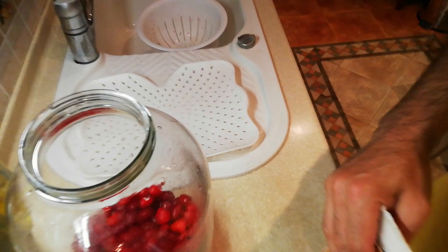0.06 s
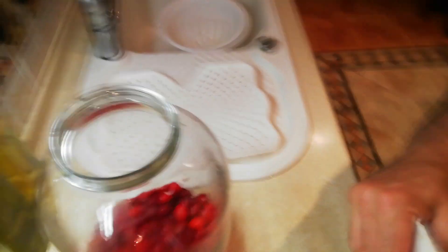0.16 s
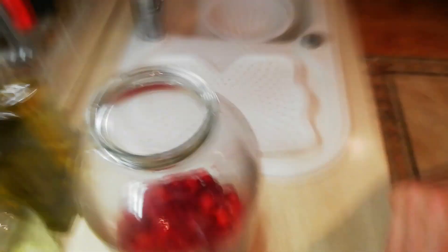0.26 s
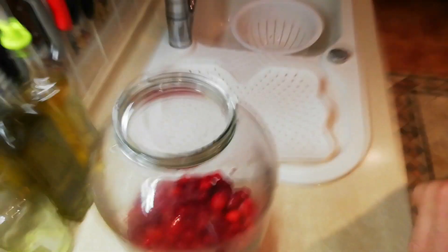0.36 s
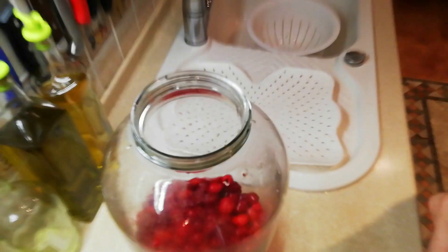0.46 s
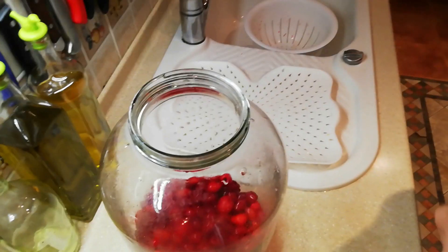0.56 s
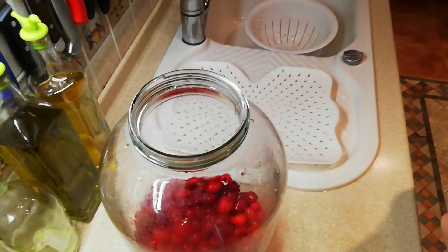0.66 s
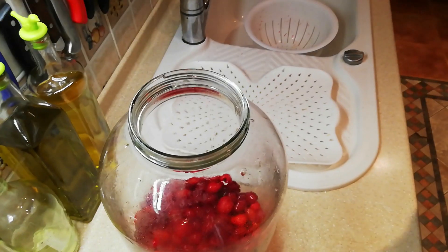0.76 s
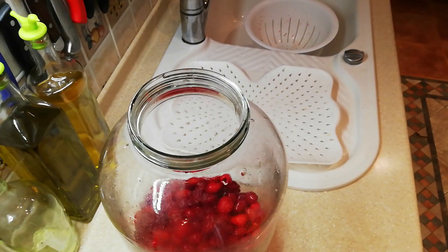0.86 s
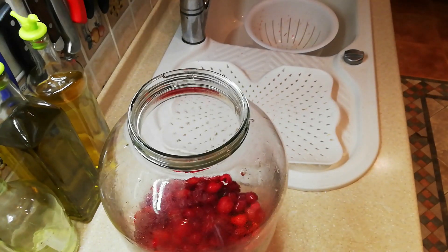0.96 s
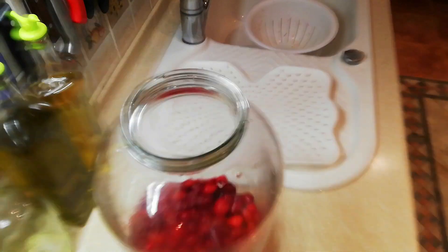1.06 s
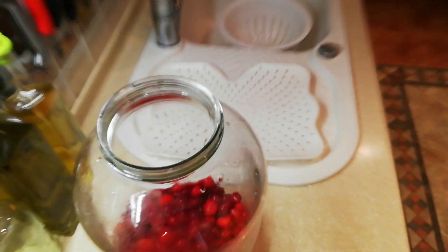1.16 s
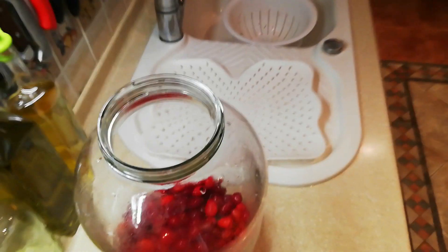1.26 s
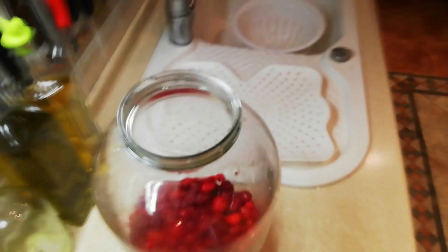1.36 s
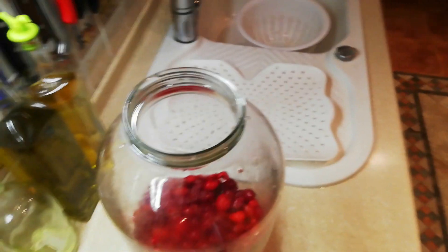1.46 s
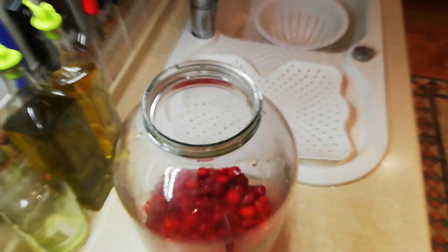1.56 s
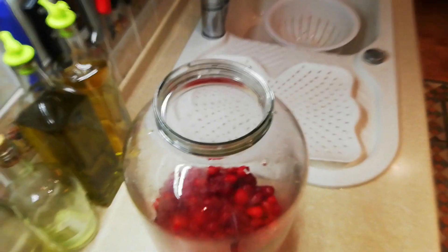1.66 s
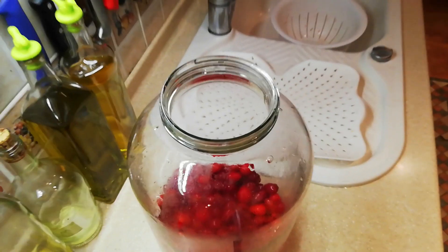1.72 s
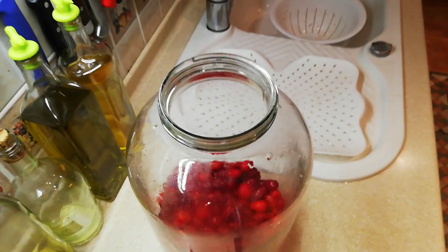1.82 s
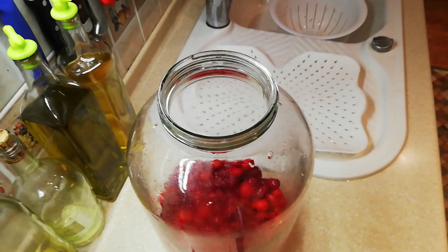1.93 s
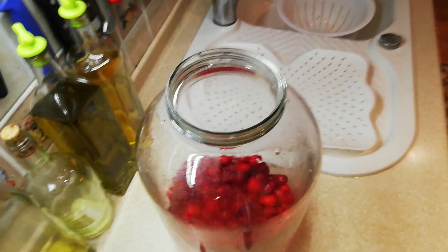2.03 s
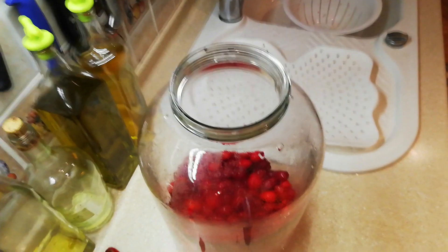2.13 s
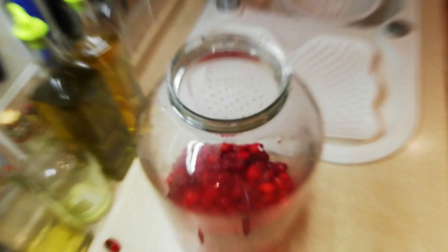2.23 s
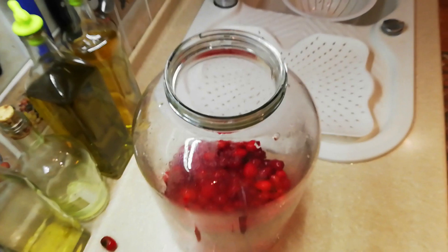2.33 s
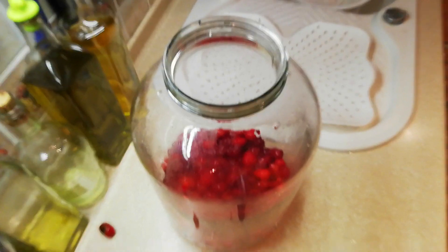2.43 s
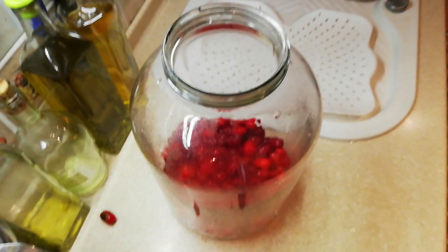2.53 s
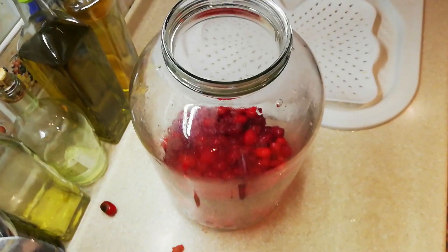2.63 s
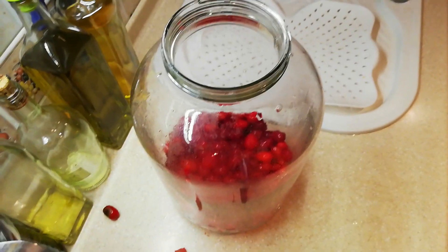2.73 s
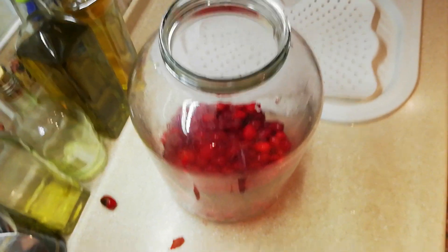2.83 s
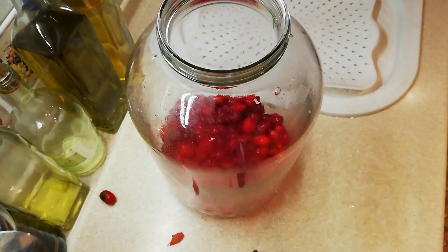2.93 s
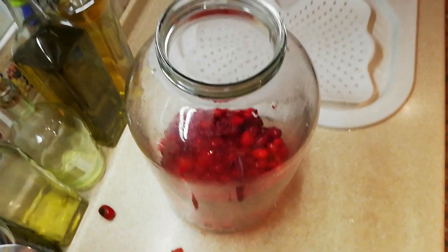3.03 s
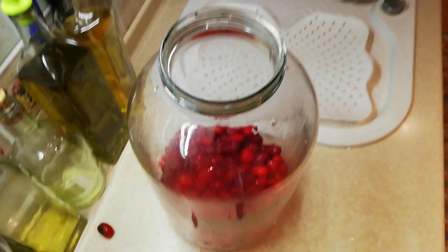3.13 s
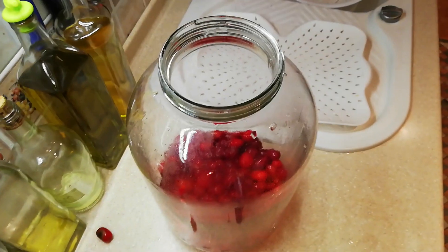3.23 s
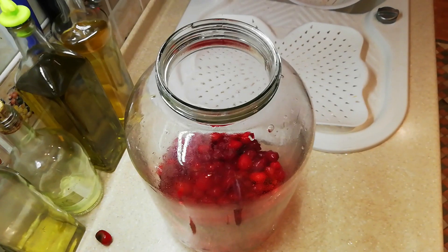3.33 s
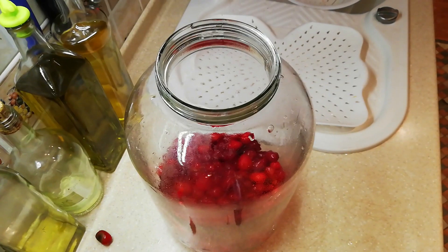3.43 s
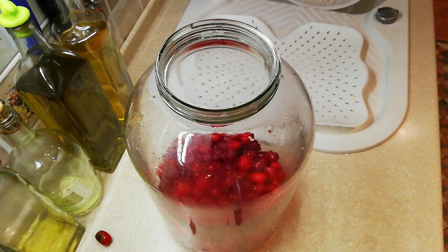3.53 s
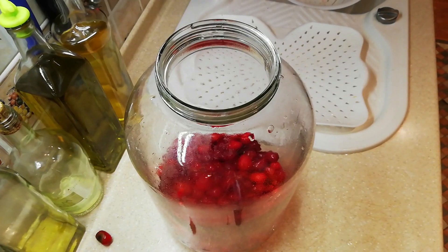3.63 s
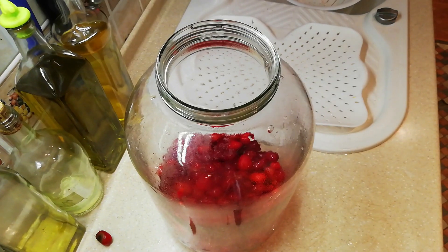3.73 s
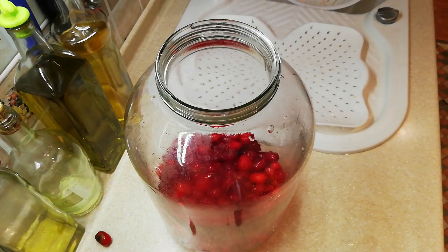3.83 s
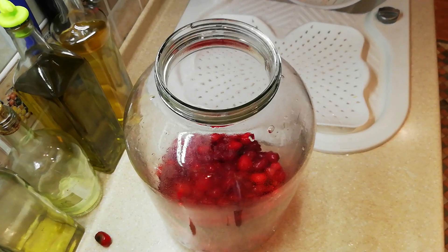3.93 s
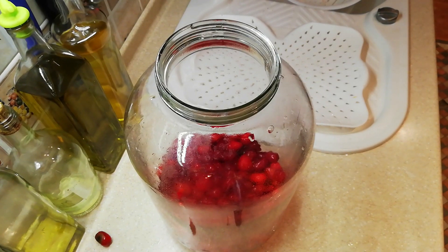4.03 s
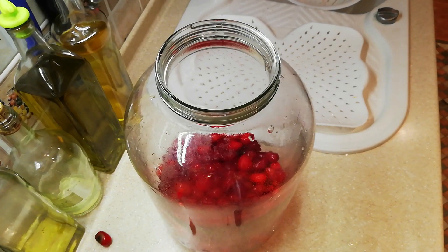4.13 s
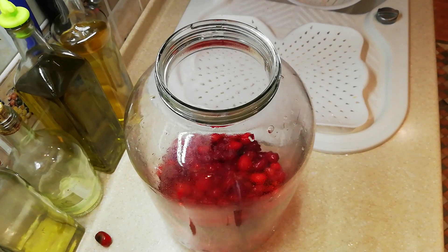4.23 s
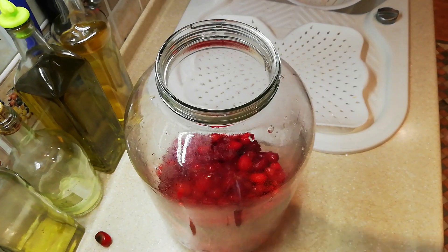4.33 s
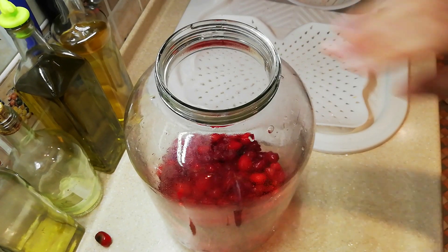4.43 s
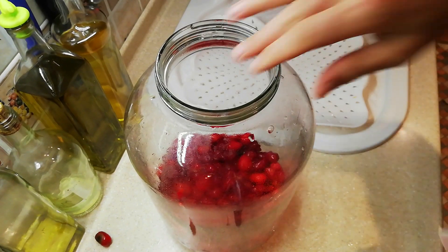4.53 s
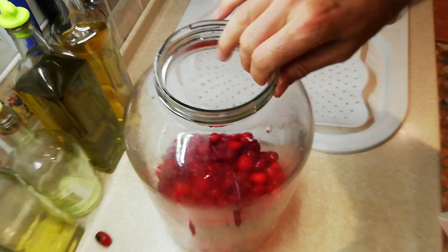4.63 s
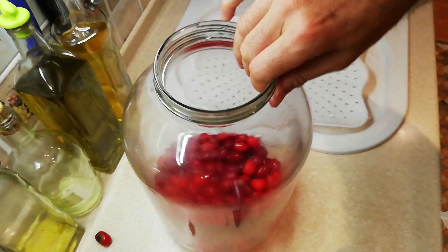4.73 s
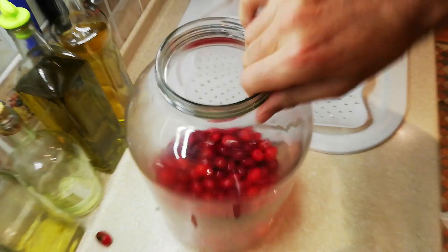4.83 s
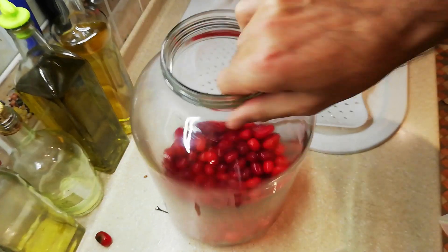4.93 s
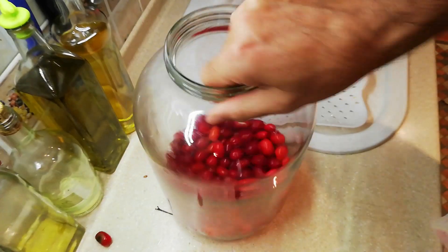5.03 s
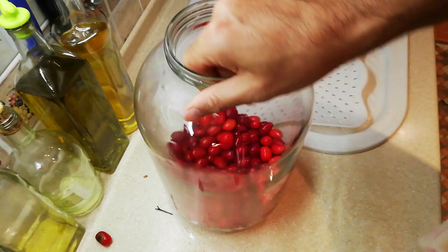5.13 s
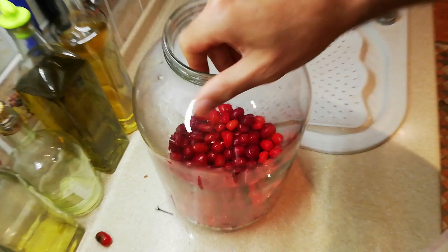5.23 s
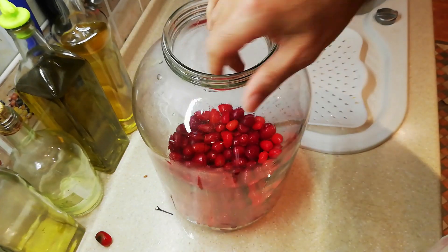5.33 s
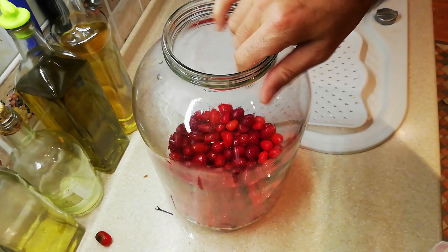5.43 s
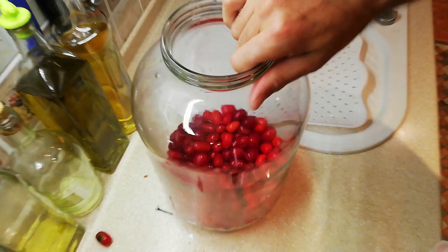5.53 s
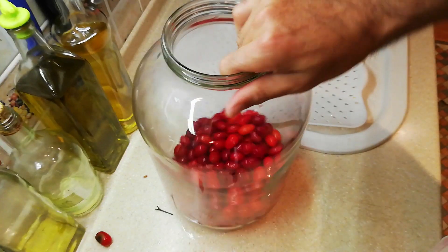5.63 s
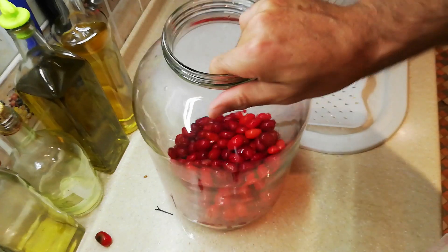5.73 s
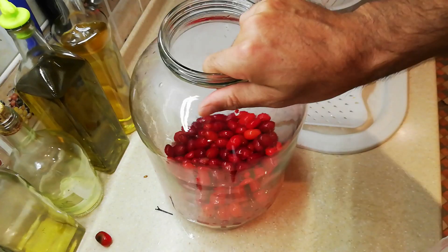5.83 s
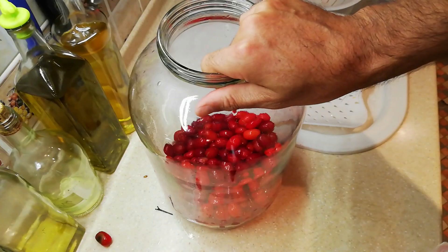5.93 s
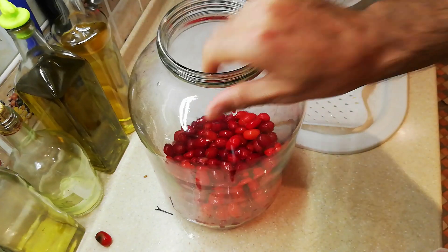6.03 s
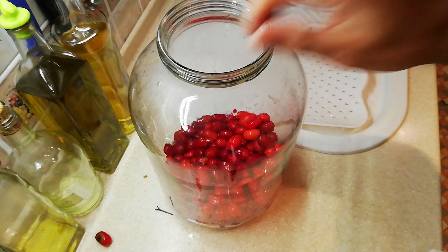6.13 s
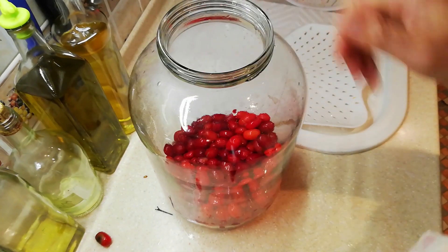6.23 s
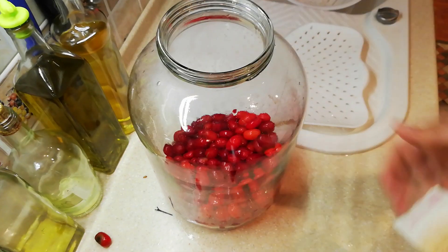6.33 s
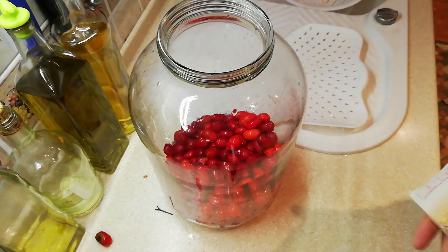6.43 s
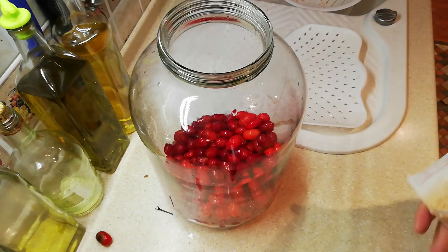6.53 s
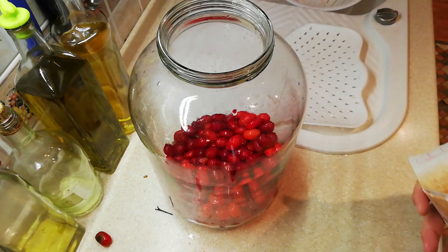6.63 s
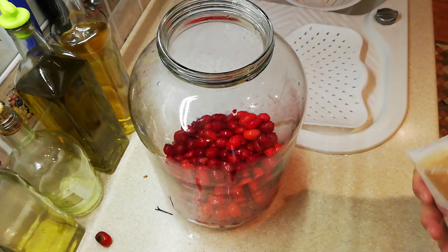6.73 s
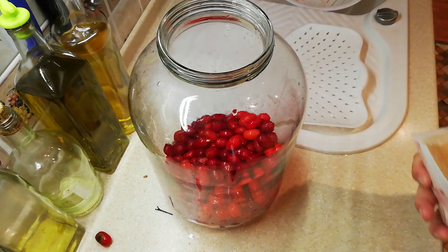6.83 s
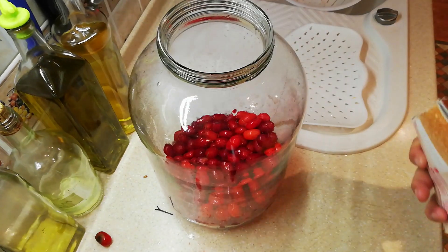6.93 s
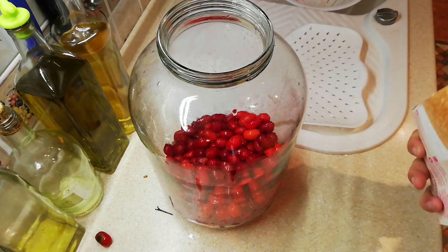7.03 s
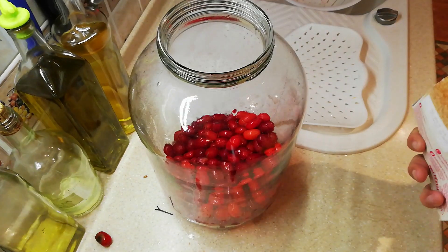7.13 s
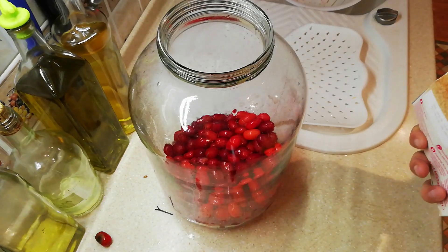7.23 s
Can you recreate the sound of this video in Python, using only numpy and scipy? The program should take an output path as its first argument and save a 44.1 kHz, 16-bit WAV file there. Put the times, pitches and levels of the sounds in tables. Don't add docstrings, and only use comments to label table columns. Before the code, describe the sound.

A small tiled kitchen heard close with handheld stereo microphones, quiet low room hum and soft handling rumble beneath. From 0 to 0.6 s a paper bag is crumpled, bright and crackly, starting to the right. Lighter rustles and snaps run from 0.9 to 1.7 s, with a soft counter bump near 1.5. At 1.82 s a plastic tray clatters hollowly, with a faint knock at 2.15; at 2.3 the bag drops with the sharpest crack, another snap at 2.5. Then near quiet, tiny paper ticks until 4.4. From 4.6 a heavy jar is moved: knock at 4.76, gritty drag and whining glass, fruit tumbling dully, a deep slam at 5.28. A brief squeak at 5.6, second, softer slam at 5.77, then a thin singing rim and dull push from 6.15 to 6.4. From 6.5 the paper bag is taken up, crackling densely, loudest around 7, continuing to the end at about 7.4 s.

```python
import sys
import numpy as np
from scipy import signal
from scipy.fft import rfft, irfft, next_fast_len
from scipy.io import wavfile
from scipy.ndimage import uniform_filter1d

SR = 44100
rng = np.random.default_rng(int(sys.argv[2]) if len(sys.argv) > 2 else 0)


def volts_from_db(level):
    exponent = np.asarray(level, float) / 20
    return 10 ** exponent


def bounce(signal):
    frames = np.transpose(np.atleast_2d(signal))
    limited = np.clip(frames, -1, 1)
    pcm = np.round(limited * 32767).astype(np.int16)
    wavfile.write(sys.argv[1], SR, pcm)


N = 320362
T = np.arange(N) / SR
HZ = np.fft.rfftfreq(2 * next_fast_len(N // 2 + 1), 1 / SR)
SIZE = 2 * (len(HZ) - 1)
OPPOSITE = np.array([[1], [-1]])

# left-right level in dB at 8 kHz, its change in dB per octave.
SNAP_SIDES = [
    (5.5, 7),
    (1, 6),
    (-2, 0.5),
    (-2.5, 3),
]


def evened(x):
    return x / np.sqrt(np.mean(x ** 2) + 1e-20)


def peaked(x, db):
    return x * volts_from_db(db) / abs(x.mean(0)).max()


def read(points, hz):
    f, value = np.transpose(points)
    return np.interp(np.log(hz + 1), np.log(f + 1), value)


def shaped(x, gain):
    return irfft(rfft(x, SIZE) * gain, SIZE)[..., :N]


def coloured(x, points):
    return evened(shaped(x, volts_from_db(read(points, HZ))))


def band(x, lo_hz, hi_hz):
    return signal.sosfilt(signal.butter(2, [lo_hz, min(hi_hz, .45 * SR)], "band", fs=SR, output="sos"), x)


def ring(x, hz, width):
    r = np.exp(-np.pi * width / SR)
    return signal.lfilter([1 - r, 0, r - 1], [1, -2 * r * np.cos(2 * np.pi * hz / SR), r * r], x)


def level(curves):
    return sum(volts_from_db(np.interp(T, *np.transpose(curve), -200, -200)) for curve in curves)


def strokes(peak, rise, fall, db):
    coarse = T[::32]
    t = coarse[:, None] - peak
    away = np.where(t < 0, -t / np.abs(rise), t / np.abs(fall))
    return np.interp(T, coarse, volts_from_db(db - 27 * away ** 1.353).sum(1))


def add(mix, s, sound):
    part = mix[:, round(s * SR):][:, :sound.shape[1]]
    part += sound[:, :part.shape[1]]


def grains(per_s, spread_db, ms):
    size = volts_from_db(spread_db * np.minimum(rng.exponential(1, N), 5))
    size = size * (rng.random(N) < per_s / SR)
    keep = np.exp(-1000 / (ms * SR))
    envelope = np.sqrt(signal.lfilter([1], [1, -keep], size ** 2))
    return evened(envelope * rng.standard_normal((2, N)))


def burst(t60, rise_ms, lumps_ms, lumps_db, size=SR // 3):
    t = np.arange(size) / SR
    noise = rng.standard_normal((3, size))
    lump = uniform_filter1d(noise[2], max(int(lumps_ms * SR / 1000), 1))
    decay = volts_from_db(-60 * t / max(t60, .004))
    return noise[:2] * volts_from_db(lumps_db * evened(lump)) * decay * (1 - np.exp(-1000 * t / rise_ms))


def patchy(x, patch_db, bins, frames):
    z = signal.stft(x, nperseg=256)[2]
    field = rng.standard_normal(z.shape[1:])
    field = uniform_filter1d(uniform_filter1d(field, bins, 0), frames, 1)
    return signal.istft(z * volts_from_db(patch_db * evened(field)), nperseg=256)[1][:, :N]


def room_tone():
    # frequency in Hz, level in dB per Hz.
    tone = [(41, -32), (70, -2), (171, -12.5), (240, -27), (426, -21), (547, -25), (992, -17.5),
            (2010, -27.5), (15000, -36.5), (16500, -43.5)]
    air = volts_from_db(-57.5) * coloured(rng.standard_normal((2, N)), tone)
    return air + volts_from_db(-67.0) * evened(ring(rng.standard_normal((2, N)), 321.2, 21))


def rumble():
    # peak in seconds, rise in seconds, fall in seconds, air in dB, thuds in dB against the air.
    shifts = [(.33, 0.25, 0.38, -38.5, 0), (.53, 0.15, 0.18, -38, -9), (1.25, 0.078, 0.19, -42, 4),
              (1.55, 0.34, 0.85, -49.5, -2.5), (4.37, 0.1, 0.39, -47, -15.5), (4.75, 0.11, 0.75, -45, -25),
              (5.3, 0.091, 0.69, -56, -28.5), (5.66, 0.17, 0.16, -42, -27), (6.25, 0.15, 0.32, -43.5, -6),
              (6.75, 0.38, 0.86, -81, 2), (7.25, 0.068, 0.069, -55.5, 15), (.95, 0.14, 0.27, -55, -1)]
    peak, rise, fall, air_db, thud_db = np.transpose(shifts)
    stir = volts_from_db(-57.5) + strokes(peak, rise, fall, air_db)
    grip = volts_from_db(-68.5) + strokes(peak, rise, fall, air_db + thud_db)
    deep = stir * evened(band(band(rng.standard_normal((2, N)), 12, 80), 20.5, 95))
    thuds = grip * evened(band(grains(90, 0.89, 12.0), 70, 274))
    return deep + thuds, .55 * band(thuds[0] - thuds[1], 110, 420) * OPPOSITE


def kitchen(x):
    # frequency in Hz, t60 in seconds.
    reverb = [(100, 0.63), (500, 0.091), (2000, 0.3), (6000, 0.23), (14000, 0.23)]
    taps = np.zeros((2, SR // 2))
    start = np.arange(200, SR // 2 - 20, 20)
    at = start + rng.integers(0, 20, (2, len(start)))
    np.put_along_axis(taps, at, rng.choice([-1., 1.], at.shape), 1)
    hz, t, z = signal.stft(taps, SR, nperseg=256)
    tail = signal.istft(z * volts_from_db(-60 * t / read(reverb, hz)[:, None]), SR, nperseg=256)[1]
    return signal.fftconvolve(x, tail / np.linalg.norm(tail[0]), axes=1)[:, :N]


def clatter():
    # start in seconds, peak in dB, rattling t60 in seconds, brightness in dB per octave.
    hits = [
        (1.821, -13.5, 0.45, 2),
        (1.837, -14, 0.17, -5),
        (2.144, -31.5, 0.27, -18.5),
        (2.153, -36.5, 0.083, 0),
    ]
    # frequency in Hz, level in dB, t60 in seconds.
    tray_modes = [(754, -9, .3), (824, -7, .38), (1238, -9, .4), (1292, -8, .5), (1561, -4, .4),
                  (2283, 0, .5), (2401, -9, .5), (2573, -10, .4), (2966, -13, .5), (3540, -15, .3),
                  (4221, -15, .4), (4587, -11, .4), (4877, -15, .36), (5480, -18, .5)]
    out = np.zeros((2, N))
    for s, db, t60, tilt_db in hits:
        rebounds = burst(t60, 3.0, 2.0, 3.6)
        modes = 0
        for hz, mode_db, mode_t60 in tray_modes:
            gain = volts_from_db(mode_db + tilt_db * np.log2(hz / 1000))
            modes = modes + gain * evened(ring(rebounds, hz, 4.6 / min(mode_t60, .5)))
        rattle = evened(band(band(rebounds, 610, 1900), 600, 2000))
        rattle += volts_from_db(2.2 * tilt_db - 7.5) * evened(ring(rebounds, 3300, 500))
        sound = 0.67 * evened(modes) + evened(rattle) + 0.15 * evened(ring(rebounds, 920, 90))
        add(out, s, peaked(band(sound, 230, 7200), db) * volts_from_db(.8 * OPPOSITE))
    return out


def draining_board():
    bag_drop = (2.3148, -19.5)
    # frequency in Hz, level in dB.
    board_modes = [(834, -10.5), (1830, -6.5), (2116, -12.5), (3400, 9.5), (3500, -3.5), (4312, -28)]
    s, peak_db = bag_drop
    blow = burst(0.027, 0.81, 0.56, 0.85)
    board = sum(volts_from_db(db) * evened(ring(blow, hz, 60 + 0.062 * hz)) for hz, db in board_modes)
    out = np.zeros((2, N))
    add(out, s, peaked(board, peak_db))
    return out


def rustle():
    # peak in seconds, rise in seconds, fall in seconds, effort in dB, thinness in dB.
    efforts = [(.2, 0.98, 0.33, -46, 37), (.35, 0.25, 0.1, -36.5, 8), (.5, 0.17, 0.15, -47, -1),
               (.8, 0.38, 0.54, -52.5, 5.5), (0.916, 0.0056, 0.22, -43, 5), (1.0, 0.039, 0.22, -36.5, 10),
               (1.189, .005, 0.11, -37.5, 13), (1.308, 0.18, 0.31, -43, 6), (1.6, 0.61, 0.75, -61.5, -3),
               (1.829, 0.016, 0.15, -43, -6), (2.2, 0.19, 0.084, -49.5, 9), (2.5, 0.064, 0.21, -48.5, 10),
               (3.253, 0.077, 0.34, -64, 12), (3.682, 0.34, 0.058, -60, 5),
               (4.027, 0.021, 0.45, -42.5, 15.5), (4.344, 0.72, 0.039, -56.5, -2),
               (6.517, 0.0064, 0.43, -42, 7), (6.841, 0.051, 0.1, -35, 0.5), (6.77, .005, 0.13, -40.5, 7.5),
               (6.929, .004, 0.16, -43.5, 2), (7.018, 0.12, 0.15, -28, 6.5), (7.2, 0.69, 1, -35, 10)]
    # frequency in Hz, level in dB per Hz.
    paper = [(150, -33), (290, -18.5), (500, -13.5), (1260, -3.5), (2460, -6), (3300, 1.5), (6610, -2.5),
             (10200, 2), (12300, -9.5), (15100, -6), (16000, -23.5)]
    # peak in seconds, rise in seconds, fall in seconds, level in dB, ring in Hz.
    pockets = [(0.17, .4, .2, -53.5, 5700), (6.83, 0.05, 0.06, -48, 3350), (7.22, 0.03, 0.1, -46, 3210),
               (7.2, 0.28, .4, -41, 5090), (3.24, .05, .55, -58, 10500), (3.24, .05, .5, -63, 6200),
               (3.64, .42, .15, -59, 10200)]
    # time in seconds, left-right level in dB.
    sideways = [(0.0, -17.5), (0.176, -5.5), (0.43, 2), (0.918, -2), (1.2, 2)]
    crackle = sum(evened(ring(grains(140, 4.0, .4), hz, .6 * hz)) for hz in (2500, 5000, 9500))
    fibres = patchy(coloured(grains(5000, 3.0, 1.2), paper), 3.2, bins=4, frames=20)
    sheet = fibres + .3 * coloured(crackle, paper)
    peak, rise, fall, db, thin_db = np.transpose(efforts)
    ranges = [(db, [(5000, 0), (7500, 1)]),
              (db - 1 - 0.63 * thin_db, [(1900, 0), (3000, 1), (5000, 1), (7500, 0)]),
              (db - thin_db, [(1900, 1), (3000, 0)])]
    out = np.zeros((2, N))
    for part_db, share in ranges:
        out += strokes(peak, rise, fall, part_db) * evened(shaped(sheet, read(share, HZ)))
    for *grip, hz in pockets:
        out += strokes(*grip) * evened(ring(sheet, hz, .07 * hz))
    pan_db = np.interp(T, *np.transpose(sideways), 0, 0)
    return out * volts_from_db(pan_db * OPPOSITE / 2)


def snaps(spells, sides):
    out = np.zeros((2, N))
    for spell, (side_db, octave_db) in zip(spells, sides):
        for s, db, hz, low_db in spell:
            tick = burst(.006, 0.14, 0.86, 1.5, size=SR // 20)
            tick = tick + volts_from_db(-16) * burst(0.042, 1.0, 1.7, 2.7, size=SR // 20)
            high = ring(tick, hz, 0.096 * hz) + 0.23 * band(tick, 0.42 * hz, 2.5 * hz)
            sound = peaked(high, db) + peaked(band(tick, 760, 2300), db + low_db)
            pan_db = side_db + octave_db * np.log2(hz / 8000)
            add(out, s, sound * volts_from_db(pan_db * OPPOSITE / 2))
    return out


def creases():
    # start in seconds, peak in dB, ring in Hz, low part in dB.
    crumple = [(0.275, -18.5, 7900, -13.5), (0.331, -25, 10200, -17), (0.3645, -24, 10340, -28),
               (0.3819, -15.5, 9010, -24), (0.3978, -20, 10800, -18), (.4035, -21.5, 10440, -21),
               (.4655, -26.5, 10400, -29), (.5384, -30.5, 10300, -28), (0.548, -26.5, 10400, -36),
               (0.6157, -28.5, 10100, -25)]
    put_down = [(0.9923, -24.5, 3400, -29), (1.189, -35, 3820, -21), (1.2802, -17, 9300, -13.5),
                (1.474, -26.5, 3360, -19), (1.664, -29.5, 7950, -33.5), (1.842, -20.5, 9600, -30),
                (1.945, -32, 8050, -30), (1.9834, -24.5, 4230, -24), (2.061, -33.5, 8500, -22),
                (2.099, -28, 9040, -29.5), (2.196, -24, 3800, -9), (2.2879, -10, 7970, -16),
                (2.3175, -3.5, 8380, -11.5), (2.3204, -6, 10500, -31.5), (2.327, -18, 10700, -35),
                (2.3334, -22, 10140, -35.5), (2.432, -29.5, 7600, -36.5), (2.492, -42, 7600, 4),
                (2.5201, -8, 6390, -19), (2.523, -11.5, 10300, -42), (2.532, -13, 9500, -29),
                (2.6233, -17.5, 8460, -33), (2.713, -41.5, 3750, -28), (2.936, -32, 6200, -21),
                (3.1994, -26.5, 9530, -18), (3.242, -33, 9400, -25), (3.42, -41, 2320, 2.5)]
    take_up = [(4.0822, -34, 9400, 1), (4.15, -37, 9250, 5), (4.2944, -32.5, 4330, -17),
               (6.7144, -22.5, 9100, -21), (6.767, -18.5, 9850, -44), (6.785, -20, 9740, -38),
               (6.803, -16.5, 10060, -15), (6.8415, -13.5, 8750, -9), (6.926, -13.5, 6540, -14),
               (6.951, -26, 9400, -12), (6.9993, -19, 10100, -14), (7.0327, -27, 8800, -12),
               (7.0724, -17, 10260, -22), (7.1324, -14.5, 9300, -16), (7.158, -17.5, 9200, -20),
               (7.22, -18.5, 3320, -23)]
    return snaps((crumple, put_down, take_up), SNAP_SIDES[:3])


def ticks():
    # start in seconds, peak in dB, ring in Hz, low part in dB.
    fine = [(0.2974, -21.5, 7000, -12), (0.3214, -28, 9740, -9), (0.4734, -37, 10280, -20),
            (1.1917, -17.5, 4370, -28), (1.2084, -30, 10400, -22), (1.2184, -32.5, 3660, -24),
            (1.2351, -28, 10700, -20), (1.2526, -34, 9400, -22), (1.2714, -25.5, 3970, -27),
            (1.4755, -22, 10500, -26), (1.4834, -32, 3450, -20), (6.5161, -39, 9850, -18),
            (6.5455, -29, 10000, -19), (6.6618, -36, 6380, -30), (6.8199, -22, 9900, -20),
            (6.8444, -14, 9610, -18), (6.8774, -34, 9320, -15), (6.9744, -22, 9900, -21),
            (7.0134, -22, 9840, -26), (7.0274, -18, 10140, -22), (7.0394, -17, 10340, -22),
            (7.0794, -24, 10500, -22), (7.1154, -19, 9100, -25), (7.2424, -23, 5000, -11),
            (7.2554, -20, 8100, -28), (7.2195, -18, 9000, -30), (7.0335, -15, 9500, -22),
            (1.283, -18.5, 9500, -26), (3.207, -38, 10500, -30), (3.216, -41, 9000, -30),
            (3.223, -41, 7500, -30), (3.319, -38.5, 6340, -30), (3.355, -42, 10400, -30),
            (3.4098, -37, 6860, -40), (3.4203, -34.5, 8090, -30), (3.6478, -46, 8910, -30),
            (2.504, -31, 7500, -32), (4.355, -42, 6000, -20), (.625, -38.5, 9500, -25)]
    return snaps([fine], SNAP_SIDES[3:])


def lumpy_rings(heaps):
    out = np.zeros((2, N))
    for s, db, hz, t60 in heaps:
        heap = burst(t60, 1.76, 2.5, 2.7, size=SR // 6)
        add(out, s, peaked(ring(ring(heap, hz, 45 + 0.045 * hz), hz, 174), db))
    return out


def nudges():
    # start in seconds, peak in dB, ring in Hz, t60 in seconds.
    soft = [(1.466, -32, 1630, 0.1), (1.83, -40, 186, 0.35), (2.15, -25, 861, 0.11),
            (6.52, -49.5, 254, 0.25), (6.55, -42.5, 780, 0.17), (6.71, -43, 195, 0.11),
            (6.98, -40.5, 316, 0.28), (6.3, -48, 786, 0.19)]
    return lumpy_rings(soft)


def tumbles():
    # start in seconds, peak in dB, ring in Hz, t60 in seconds.
    fruit = [(4.9, -33, 112, 0.052), (4.903, -35.5, 616, 0.14), (4.93, -30, 427, 0.19),
             (4.956, -29, 228, 0.11), (4.96, -36, 620, 0.11), (4.993, -34, 913, 0.23),
             (5.028, -27, 413, 0.21), (5.045, -29, 614, 0.32), (5.055, -39, 950, 0.33),
             (5.085, -41, 770, 0.17), (5.109, -35.5, 362, .12), (5.13, -33, 142, 0.11),
             (5.15, -38, 770, 0.52), (5.166, -40.5, 1140, .2), (5.17, -34.5, 183, 0.43),
             (5.225, -37.5, 348, 0.15), (5.354, -26, 113, 0.084), (5.405, -38, 132, .1),
             (5.448, -32.5, 117, 0.1), (5.63, -41, 604, 0.13), (5.662, -35, 746, 0.063),
             (5.669, -39, 367, 0.075), (5.72, -47, 690, 0.11), (5.95, -42.5, 397, .08)]
    return lumpy_rings(fruit)


def body(x):
    # frequency in Hz, level in dB.
    jar_modes = [(113.0, -30.5), (226.1, -45), (376.8, -40.5), (430.7, -64), (624.5, -41.5), (753.7, -40),
                 (952.8, -43), (1335, -57), (1860, -41)]
    # frequency in Hz, level in dB.
    slab_modes = [(84, -26), (180, -32.5), (326, -38.5)]
    modes = sum(volts_from_db(db + 41.5) * ring(x, hz, 16 + 0.028 * hz) for hz, db in jar_modes + slab_modes)
    return modes + volts_from_db(-7) * band(band(x, 100, 2300), 80, 2600)


def knocks():
    # start in seconds, peak in dB, boom in Hz, upper part in dB, settling t60 in seconds.
    bag_blows = [(1.189, -34.5, 75, -20, 0.039), (1.281, -36.5, 223, -1, 0.07),
                 (1.463, -25.5, 148, 0, 0.11), (1.65, -34.5, 188, -7, 0.1), (2.315, -28.5, 218, -22, 0.029),
                 (2.518, -40, 200, -1, 0.044), (3.417, -42.5, 194, -12, 0.022), (4.072, -45, 80, 4, 0.31)]
    jar_blows = [(4.761, -16, 168, -10, 0.064), (4.794, -19, 203, -5.5, 0.071),
                 (5.281, -13, 354, 0.5, 0.13), (5.628, -29.5, 80, -13, 0.086),
                 (5.659, -28.5, 182, -9, 0.99), (5.766, -13.5, 228, 0, 0.14), (6.149, -28.5, 356, -9, 0.31),
                 (7.25, -29.5, 351, -3, 0.18)]
    out = np.zeros((2, N))
    for blows, upper_hz in ((bag_blows, 1434), (jar_blows, 687)):
        for s, db, hz, upper_db, t60 in blows:
            blow = burst(2.37 * t60, 0.16, 1.4, 2.4)
            t = np.arange(blow.shape[1]) / SR
            blow = blow * (0.6 + 0.316 * np.exp(-(t / (.3 * t60)) ** 4))
            low = ring(ring(blow, hz, 86), hz, 210) + .5 * band(body(blow), 89, 710)
            low = low[0] + 0.3 * low[1] * OPPOSITE
            upper = band(body(blow), 0.74 * upper_hz, 2100)
            upper = upper + 0.66 * ring(blow, upper_hz, 0.16 * upper_hz)
            upper = upper + 0.13 * band(band(blow, 1800, 5800), 1960, 13000)
            add(out, s, peaked(low, db) + peaked(upper, db + upper_db))
    return out


def slams():
    # start in seconds, peak in dB, hold in seconds.
    presses = [
        (5.28, -12, 0.039),
        (5.764, -16.5, 0.037),
    ]
    # frequency in Hz, level in dB.
    press_modes = [
        [(110, -8), (210, -9.5), (365, 3), (400, -3), (624, -11), (759, -6)],
        [(112, -13), (225, -3), (380, 7), (480, -7), (754, -29)],
    ]
    out, t = np.zeros((2, N)), np.arange(SR // 8) / SR
    for (s, db, hold), modes in zip(presses, press_modes):
        boom = 0
        for hz, mode_db in modes:
            phase = rng.random() * 0.287 + np.array([[0], [.03]])
            boom = boom + volts_from_db(mode_db) * np.sin(2 * np.pi * (hz * t + phase))
        shape = (1 - np.exp(-t / 0.0017)) * np.exp(-np.maximum(t - hold, 0) / 0.0063)
        judder = volts_from_db(2.5 * np.sin(2 * np.pi * (68 * t + 4000 * t ** 2)))
        add(out, s, peaked(boom * shape * judder, db))
    return out


def rim():
    # frequency in Hz, width in Hz, level in dB.
    glass = [(1845, 37, 0), (2910, 52, -8), (3150, 70, -3), (3780, 45, -1), (3960, 40, -10),
             (4530, 40, -11), (4800, 86, -14), (5330, 98, -7), (5810, 100, -14), (7240, 29, -10),
             (8650, 71, -19), (9460, 49, -17), (9770, 33, -16), (10600, 74, -17)]
    # time in seconds, level in dB.
    singing = [
        [(5.592, -80.5), (5.602, -48), (5.625, -54), (5.7, -60)],
        [(6.13, -93), (6.164, -55), (6.336, -54), (6.5, -70)],
    ]
    # time in seconds, level in dB.
    squeak = [(5.585, -72), (5.598, -50), (5.62, -54), (5.634, -72)]
    # time in seconds, pitch factor.
    glide = [(5.59, 1.08), (5.605, .88), (5.62, .65), (5.64, 0.5)]
    # start in seconds, peak in dB, t60 in seconds, brightness in dB per octave.
    slips = [(6.1517, -37.5, 0.26, 14), (6.1824, -39.5, 0.063, 8), (6.222, -42, 0.07, 2),
             (6.244, -42, 0.072, -10), (6.2677, -44, 0.09, -12), (6.29, -37.5, 0.053, -2),
             (6.314, -42, 0.086, -6), (6.35, -53.5, 0.13, -10), (6.372, -55, .06, -4)]
    skin = rng.standard_normal(N)
    lowest = glass[0][0]
    hz = lowest + 7.8 * evened(uniform_filter1d(skin, 500))
    falling = np.sin(2 * np.pi * np.cumsum(hz * np.interp(T, *np.transpose(glide))) / SR)
    falling = falling * (1 + 0.73 * evened(uniform_filter1d(skin, 90)))
    note = np.sin(2 * np.pi * np.cumsum(hz) / SR + np.array([[0], [np.pi / 2]]))
    rough = evened(ring(grains(460, 1.4, 4.9), lowest, 58))
    out = level(singing) * evened(evened(note) + 0.78 * rough)
    out += level([squeak]) * falling
    for s, db, t60, tilt_db in slips:
        slip = burst(t60, 0.54, 5.6, 2.5, size=SR // 5)
        upper = 0
        for hz, width, mode_db in glass[1:]:
            octaves = np.log2(np.clip(hz, 3800, 5400) / 3800)
            mode = ring(ring(ring(slip, hz, 1.5 * width), hz, 5 * width), hz, 6 * width)
            upper = upper + np.sqrt(width) * volts_from_db(mode_db + tilt_db * octaves) * evened(mode)
        add(out, s, peaked(upper, db))
    return out


def drag():
    # peak in seconds, rise in seconds, fall in seconds, boom in dB, grit in dB against the boom.
    pushes = [
        (4.62, 0.36, 0.88, -73, 2),
        (4.95, 0.23, 0.35, -35.5, -4),
        (5.171, 0.37, 0.18, -40.5, 7),
        (5.727, 0.15, 0.14, -46, 10.5),
        (6.294, 0.26, 0.15, -38, -20),
    ]
    # start in seconds, boom in dB.
    landings = [
        (5.29, -23.5),
        (5.784, -33.5),
    ]
    # frequency in Hz, level in dB per Hz.
    gritty = [(1290, -2.5), (2200, -3.5), (3680, -3), (6690, -5), (10100, 1), (15000, -19.5), (15700, -15),
              (16500, -89)]
    # time in seconds, level in dB.
    whining = [(4.5, -70), (4.57, -56.5), (4.764, -47.5), (5.2, -46.5), (5.27, -56)]
    # frequency in Hz, width in Hz, level in dB.
    whine_bands = [(1800, 400, 2), (2790, 500, -9), (3680, 90, -5), (4600, 300, -8), (5330, 500, -10),
                   (7800, 1500, -9)]
    # time in seconds, tilt in dB per octave.
    opening = [(4.55, -10.5), (4.7, -1.5), (5.2, -1)]
    peak, rise, fall, db, grit_db = np.transpose(pushes)
    land, land_db = np.transpose(landings)
    weight = strokes(peak, rise, fall, db) + strokes(land, 0.0052, 0.22, land_db)
    rub = strokes(peak, rise, fall, db + 0.31 * grit_db - 2.5)
    slide = strokes(peak, rise, fall, db + grit_db) + strokes(land, 0.0052, 0.065, land_db - 13)
    shaken = body(grains(1500, 6.3, 6.4))
    boom = weight * evened(band(shaken, 130, 366))
    scrape = rub * evened(band(band(shaken, 410, 1280), 460, 3300))
    grit = patchy(coloured(grains(6700, 3.0, 5.2), gritty), 1.7, bins=2, frames=40)
    opens_db = np.interp(T, *np.transpose(opening))
    whine = 0
    for hz, width, band_db in whine_bands:
        gain = volts_from_db(band_db + opens_db * np.log2(hz / 1750))
        whine = whine + gain * evened(ring(grit, hz, width))
    return boom + scrape + slide * evened(grit) + level([whining]) * whine


def heard(x, lean, lead):
    # frequency in Hz, left-right likeness.
    likeness = [(60, 0.99), (180, 0.95), (300, .82), (550, .45), (1200, .3), (2000, .2), (4970, .1),
                (15000, .1)]
    z = rfft(x, SIZE)
    turn = np.arcsin(np.clip(read(likeness, HZ), -1, 1)) / 2
    delay = lead / SR / (1 + (330 / (HZ + 1)) ** 4)
    side = volts_from_db(read(lean, HZ) / 2) * np.exp(1j * np.pi * HZ * delay)
    return (z * np.cos(turn) + z[::-1] * np.sin(turn)) * [side, 1 / side]


def scene():
    # frequency in Hz, left-right level in dB.
    jar_lean = [(380, 0), (700, 5.5), (1290, 4), (2400, -3.5), (4400, -1), (8100, 0), (15000, 9.5)]
    bag_lean = [(380, -1.5), (700, -2.1), (1500, -0.5), (3000, -4.5), (6000, -2.5), (15000, 5.5)]
    folds = creases()
    blows = knocks() + clatter() + draining_board()
    felt, apart = rumble()
    bag = folds + ticks() + rustle() + nudges()
    bag += volts_from_db(-10.5) * kitchen(folds + blows) + room_tone()
    jar = blows + drag() + rim() + tumbles() + slams() + felt
    pair = heard(jar, jar_lean, 10) + heard(bag, bag_lean, -10)
    return irfft(pair, SIZE)[:, :N] + apart


def low_pass(x):
    return signal.sosfilt(signal.butter(12, 16640, fs=SR, output="sos"), x)


def record(dry):
    limited = .95 * np.tanh(dry / .95)
    top_loss = [(11500, 0.), (13000, -4.5), (15600, -10), (16100, -23), (16500, -31.5), (16700, -70.5)]
    dulled = shaped(limited, volts_from_db(read(top_loss, HZ)))
    return low_pass(dulled)


dry = scene()
out = record(dry)
bounce(out)
```